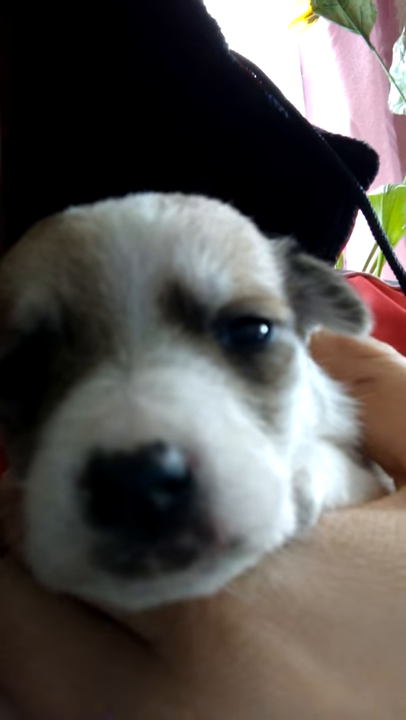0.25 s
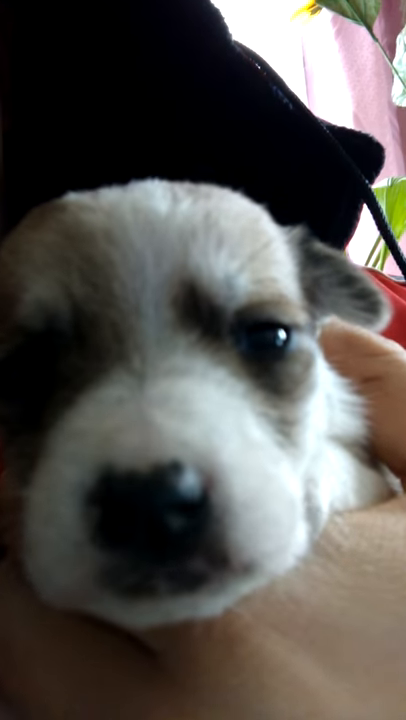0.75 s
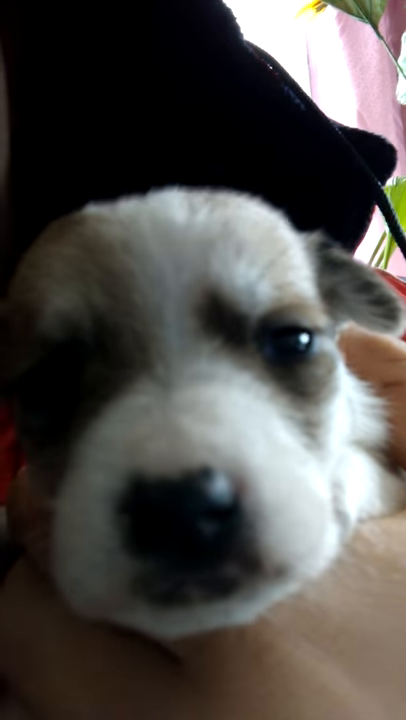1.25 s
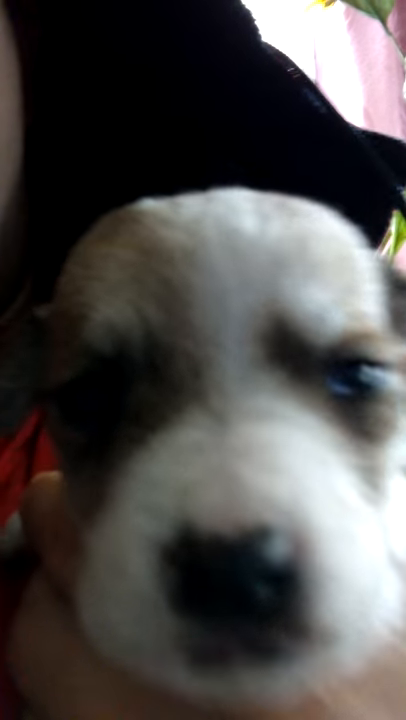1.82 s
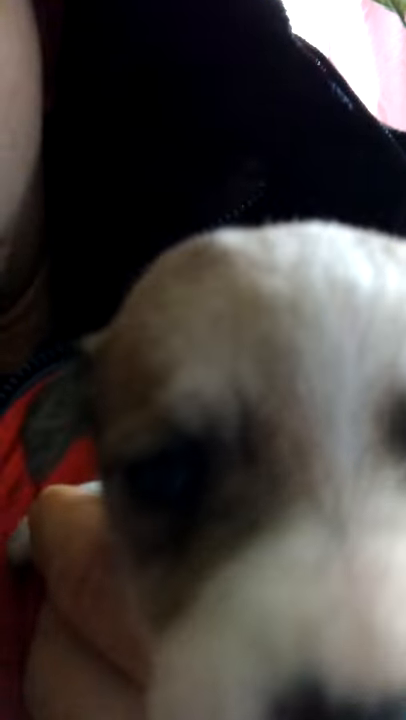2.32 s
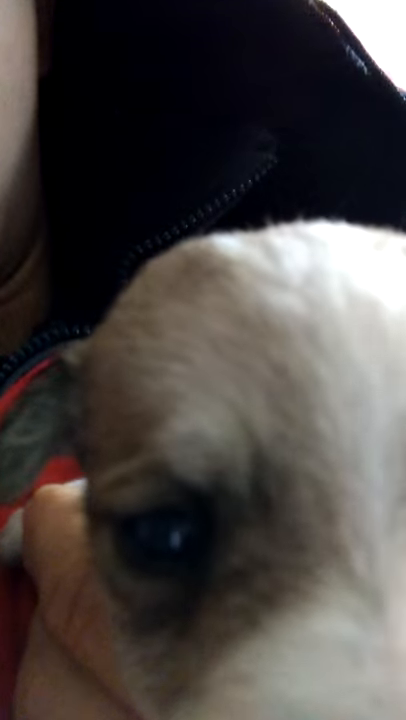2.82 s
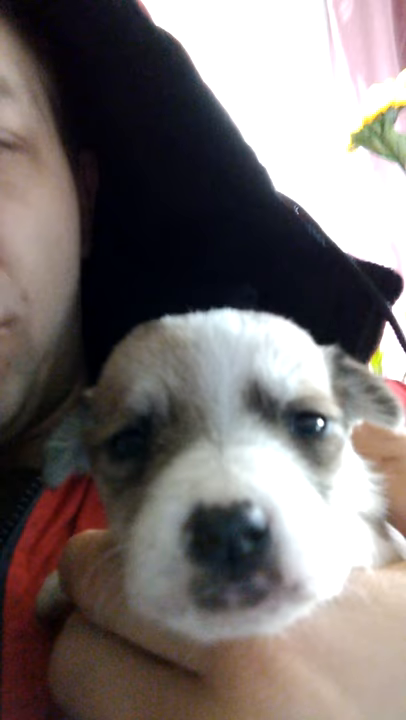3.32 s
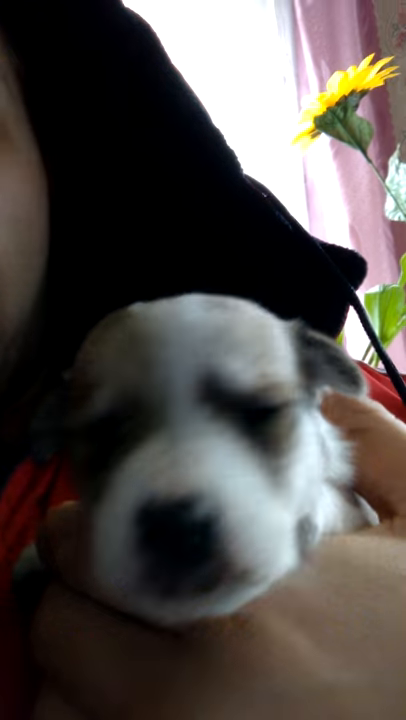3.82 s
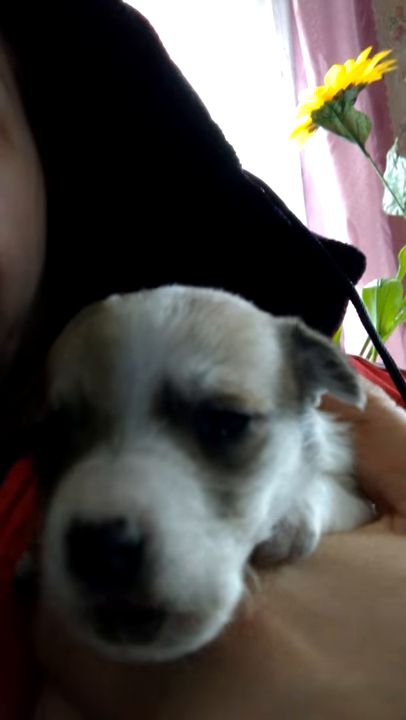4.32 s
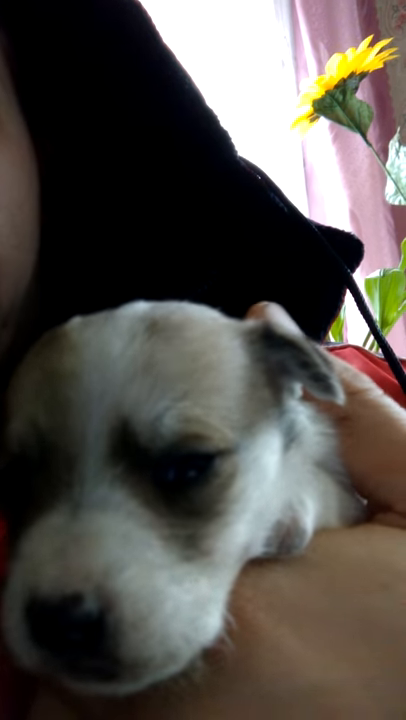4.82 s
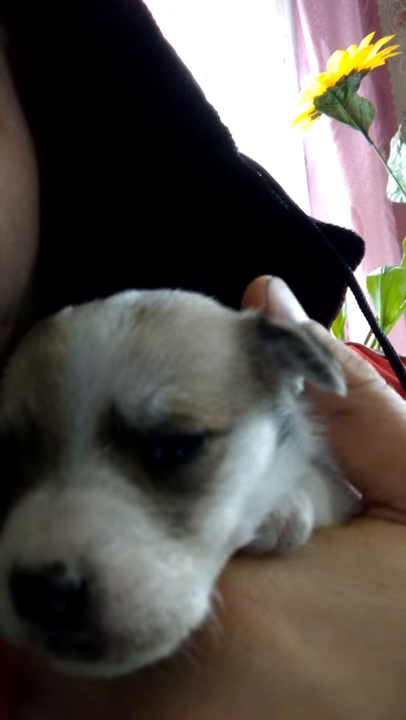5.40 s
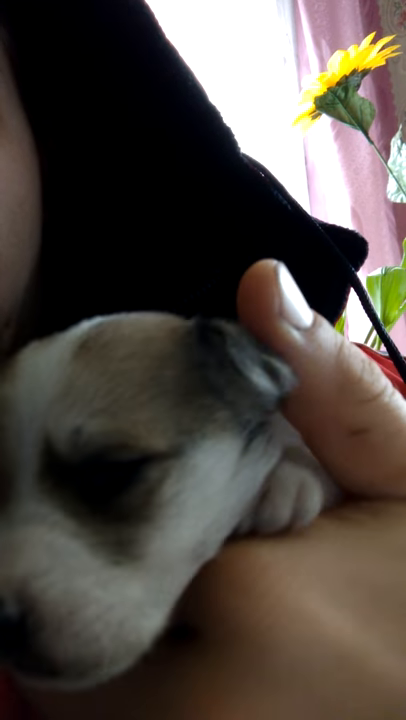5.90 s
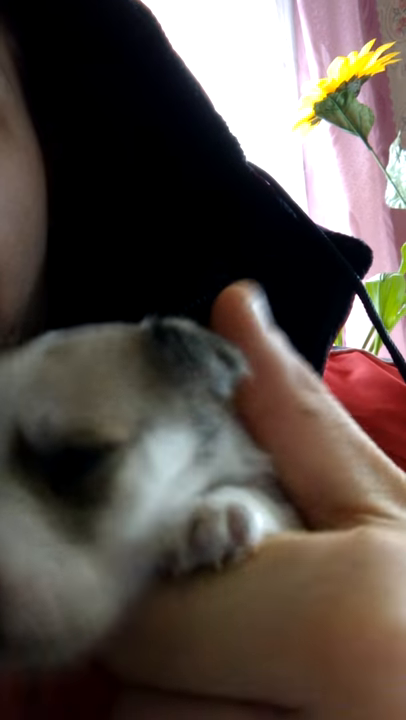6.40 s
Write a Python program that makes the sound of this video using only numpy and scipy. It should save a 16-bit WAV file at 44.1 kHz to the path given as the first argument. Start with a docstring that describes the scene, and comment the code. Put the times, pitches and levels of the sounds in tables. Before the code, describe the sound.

A very young puppy held close whines four times in a quiet room, three high gliding cries and one low grumble, then fur is stroked.

```python
"""Young puppy whining in a small room

A very young puppy, held in the arms close to a phone, whines four times in a small furnished room.
Each whine is a gliding harmonic stack coloured by throat and nose, with pulsing hiss; the last is a low grumble.
A sleeve brushes and a hand strokes fur (uneven filtered noise); soft bumps and wet ticks are short noise bursts.
Low rumble, faint microphone hiss and a thin electronic whistle lie underneath.
"""
import sys
import numpy as np
from scipy import signal
from scipy.fft import rfft, irfft, next_fast_len
from scipy.io import wavfile
from scipy.ndimage import uniform_filter1d

SR = 44100
rng = np.random.default_rng(int(sys.argv[2]) if len(sys.argv) > 2 else 0)


def transcribe(signal):
    """Save signal, clipped to [-1, 1], as a 16-bit WAV file at the path in sys.argv[1]."""
    frames = np.atleast_2d(signal).T
    limited = np.clip(frames, -1, 1)
    pcm = np.round(limited * 32767).astype(np.int16)
    wavfile.write(sys.argv[1], SR, pcm)


N = 294147
TIME = np.arange(N) / SR
TOP_HZ = 15550
# Signs of the two microphone ports. Rows: left, right.
SIDES = np.array([[1], [-1]])


def undb(db):
    """Decibels to gain."""
    return 10 ** (np.asarray(db) / 20)


def unit(x):
    """Scale to rms 1."""
    return x / np.sqrt(np.mean(x ** 2))


def curves(table, x):
    """Columns of a table, interpolated linearly over its first column."""
    knots, *columns = np.transpose(table)
    return [np.interp(x, knots, column) for column in columns]


def bell(t, centre_s, half_length_s):
    """Gaussian bump in time, peak 1."""
    return np.exp(-((t - centre_s) / half_length_s) ** 2)


def bin_hz(size):
    """Frequencies of the bins of a real FFT."""
    return np.arange(size // 2 + 1) * SR / size


def colour(points, hz):
    """Gain of a (Hz, dB) spectrum, interpolated over log frequency."""
    knots_hz, db = np.transpose(points)
    return undb(np.interp(np.log(hz + 1), np.log(knots_hz), db))


def shape(x, points):
    """Filter a sound by a (Hz, dB) spectrum."""
    n = x.shape[-1]
    size = next_fast_len(n)
    spectrum = rfft(x, size) * colour(points, bin_hz(size))
    return irfft(spectrum, size)[..., :n]


def resonate(x, hz, width_hz):
    """One resonance, gain 1 at its centre."""
    b, a = signal.iirpeak(hz, hz / width_hz, fs=SR)
    return signal.lfilter(b, a, x)


def walk(rate_hz, n):
    """Random curve of spread about 1: straight lines between knots, rate_hz knots a second."""
    knots = rng.standard_normal(8192)
    return 1.2 * np.interp(np.arange(n) * rate_hz / SR, np.arange(8192), knots)


def puppy():
    """Four whines, reaching the two ports with a level difference and lag that vary with frequency."""
    # One list per whine. Each row: time in seconds, pitch in Hz.
    pitches = [
        [(0.335, 409), (0.345, 426.6), (0.363, 465.5), (0.405, 447), (0.431, 520), (0.483, 618), (0.505, 654),
         (0.529, 620), (0.561, 664), (0.571, 681), (0.655, 732), (0.691, 729.4), (0.801, 799), (0.869, 675),
         (0.885, 574), (0.895, 475)],
        [(1.35, 603), (1.356, 611), (1.392, 694.5), (1.428, 693.5), (1.476, 780), (1.494, 865), (1.512, 819),
         (1.566, 943), (1.736, 909.3), (1.856, 835), (1.898, 823), (1.938, 860), (1.968, 828), (2.05, 815.7),
         (2.092, 772), (2.174, 779.5), (2.33, 626.4), (2.342, 581.0), (2.37, 472.2), (2.406, 410.6),
         (2.412, 394.1), (2.435, 307.0)],
        [(4.085, 509), (4.095, 530), (4.127, 771), (4.145, 866.6), (4.187, 898), (4.217, 858.6), (4.293, 977),
         (4.351, 998.6), (4.449, 928), (4.557, 765), (4.637, 700.4), (4.657, 579.5), (4.671, 497.6),
         (4.689, 396), (4.705, 360)],
        [(5.42, 435), (5.426, 450.3), (5.48, 557), (5.52, 445.4), (5.556, 329.2), (5.586, 319.8), (5.624, 437),
         (5.68, 537.4), (5.714, 472), (5.756, 458), (5.796, 393.3), (5.84, 416.6), (5.865, 303.2)],
    ]
    # One push of air per whine. Each row: start in s, end in s, attack in s, rise of higher overtones in s,
    # level in dB, swell in dB/s, swell in dB/octave of pitch, mellowness in dB, higher overtones in dB, hiss in dB.
    pushes = [(.33, 0.906, 0.18, 0.11, -33, 2.5, 13, 1.36, -55.5, -56.5),
              (1.345, 2.442, 0.03, 0.017, -23, 4, 3.46, 4, -30, -56.7),
              (4.079, 4.711, 0.036, 0.082, -24.5, 6.5, 2.3, 3, -36, -48),
              (5.416, 5.885, 0.052, 0.03, -29, -16, -0.8, 1.96, -35.5, -55)]
    # Muzzle resonances near 1 and 2 kHz for the three lowest partials, one list per whine.
    # Each row: frequency in Hz, gain in dB.
    muzzles = [
        [(420, -4.5), (700, -8), (870, -4), (1080, 3), (1300, -4.5), (1700, -13), (2050, -19), (2400, -15)],
        [(350, -16), (550, -20), (900, -7.5), (1100, -4), (1350, -10), (1750, -1.5), (2080, -9), (2550, -19.5),
         (2850, -19.5)],
        [(370, -11), (550, -22.5), (900, -9), (1100, -4.5), (1450, -13.5), (2000, -2.15), (2350, -9),
         (3000, -25)],
        [(320, -7.5), (520, -13), (700, -7), (1000, 1), (1300, -3), (1650, -11.5)],
    ]
    # Throat and nose colour of the higher overtones, one list per whine. Each row: frequency in Hz, gain in dB.
    throats = [
        [(1800, -6), (2500, 3), (3900, -10), (4400, -21), (5300, -7.5), (6000, -32), (7500, -20), (9000, -45),
         (10700, -2), (12600, -11), (15300, -26)],
        [(1500, -5), (1900, -6), (3000, -32.5), (3800, -37), (4700, -39.5), (5500, -46.5), (7800, -32.5),
         (9100, -44), (10400, -33), (14000, -65.5)],
        [(1500, -14.5), (2100, 5.5), (3100, -31), (3500, -32), (4800, -32.5), (5500, -56.5), (6100, -25),
         (8000, -28), (9100, -44), (10300, -25), (15300, -51)],
        [(1300, 2.5), (1600, -7), (2300, -9), (3200, -24.5), (4500, -37), (8800, -41), (10500, -31),
         (15300, -49)],
    ]
    # Hiss colour, one list per whine. Each row: frequency in Hz, relative density in dB per Hz.
    hisses = [
        [(200, -35), (700, -20), (1200, -2.5), (2000, -35), (2700, -13), (5900, -30), (7600, -12.5),
         (9000, -43), (10700, -8.5), (12600, -29), (13700, -20), (15300, -21)],
        [(200, -17), (1100, -2), (1500, 0.5), (2100, 0.5), (3000, -29.5), (4600, -6.5), (5900, -28.5),
         (7600, -9), (9100, -32), (10300, -16), (12400, -34), (13200, -18.5), (14500, -35)],
        [(200, -15.5), (1000, -3), (1400, -7), (2100, 11), (3200, -17), (3700, -6.5), (5300, -24),
         (6500, -28.5), (10800, -23), (15300, -31.5)],
        [(200, -10), (900, -6.5), (1600, 0), (2600, -3.5), (4400, -14.5), (8000, -16.5), (9000, -23),
         (10500, -11), (13000, -25), (15300, -30)],
    ]
    # One row per whine: bearing as a share of the port lag, pitch jitter as a share,
    # phase blur at 10 kHz in rad, fall per overtone in dB.
    manners = [(1.146, 0.0043, 0.87, 2), (1.123, .001, .45, 0.78), (0.77, 0.0011, 0.55, 1.7),
               (0.66, 0.0014, 0.67, 0.5)]
    # Microphone ports on the phone's body. Each row: frequency in Hz, left minus right in dB,
    # lag of the left in rad at bearing 1.
    port_response = [(60, 1.5, -1.5), (350, 0.5, 0.47), (716, -1, 0.55), (1340, 3, 1.25), (1850, 1, 2),
                     (2980, -1.5, 2), (5420, 4.5, 1.12), (9740, 7.5, 11.5), (15400, 9, 16.5)]
    out = np.zeros((2, N))
    for pitch, push, muzzle, throat, hiss, manner in zip(pitches, pushes, muzzles, throats, hisses, manners):
        bearing, *voice_manner = manner
        i = np.arange(int(push[0] * SR), int(push[1] * SR))
        t = i / SR
        fade = np.clip(np.minimum(t - t[0], t[-1] - t) / 0.00066, 0, 1)
        sound = fade * whine(t, pitch, push, muzzle, throat, hiss, *voice_manner)
        size = next_fast_len(2 * len(t))
        port_db, port_lag_rad = curves(port_response, bin_hz(size))
        spectrum = rfft(sound, size)
        spectrum *= undb(port_db * SIDES / 2) * np.exp(-.5j * bearing * port_lag_rad * SIDES)
        out[:, i] += irfft(spectrum, size)[:, :len(t)]
    return out


def whine(t, pitch, push, muzzle, throat, hiss, jitter, blur_rad, fall_db):
    """Vocal folds sound a gliding harmonic stack; air hisses through them once a cycle."""
    # Folds slip into strong-weak cycles. Each row: centre in s, half length in s, depth 0-1.
    croaks = [(0.392, 0.032, 0.37), (5.875, 0.005, 0.83)]
    # Throat and mouth shift briefly and one resonance stands out.
    # Each row: centre in s, half length in s, frequency in Hz, width in Hz, added resonance in dB.
    mouth_shifts = [(.872, 0.042, 1900, 500, 4.5), (1.442, .05, 7700, 1200, -4.5),
                    (2.344, 0.19, 4450, 500, 3), (2.392, 0.026, 2540, 510, 3),
                    (4.166, 0.011, 2620, 150, 24), (4.166, 0.014, 7000, 3500, 11),
                    (4.2, .05, 10500, 700, 9), (4.21, 0.024, 2620, 200, 11.5),
                    (4.61, 0.047, 4400, 700, 1.5), (5.514, 0.053, 2610, 394, 10.5)]
    n = len(t)
    hz = uniform_filter1d(curves(pitch, t)[0], size=220)
    *partials_db, upper_db, air_db = effort(t, hz, muzzle, *push)

    # quick jitter and a slower quiver of the folds
    wobbling_hz = hz * (1 + jitter * walk(700, n) + .003 * walk(55, n))
    phase = 2 * np.pi * np.cumsum(wobbling_hz) / SR
    tone = np.zeros(n)
    for k, db in enumerate(partials_db, 1):
        tone -= undb(db + .3 * walk(60, n)) * np.cos(k * phase)
    for k in range(4, 41):
        gain = colour(throat, k * hz) * np.clip((TOP_HZ - k * hz) / 500, 0, 1)
        overtone_db = upper_db + 2.2 * walk(40, n) - fall_db * (k - 4.5)
        # turbulence smears the highest overtones most
        smear = blur_rad * (k * hz / 1e4) ** 2 * walk(500, n)
        tone -= gain * undb(overtone_db) * np.cos(k * phase + smear + rng.uniform(0, 2 * np.pi))
    croak = sum(depth * bell(t, s, half_s) for s, half_s, depth in croaks)
    tone *= np.sqrt(2) * (1 + croak * np.cos(phase / 2))

    # scattered hiss reaches the two ports with opposite sign, strongest in the treble
    direct, scattered = rng.standard_normal((2, n))
    air = direct + shape(scattered, [(3000, -8.5), (10000, 1.5)]) * SIDES
    pulsing_air = air * (1 + np.cos(phase))
    sound = tone + undb(air_db) * unit(shape(pulsing_air, hiss))
    for s, half_s, mouth_hz, width_hz, db in mouth_shifts:
        sound = sound + undb(db) * bell(t, s, half_s) * resonate(sound, mouth_hz, width_hz)
    return sound


def effort(t, hz, muzzle, start_s, end_s, attack_s, rise_s, level_db, swell_db_per_s,
           swell_db_per_octave, mellow_db, upper_db, air_db):
    """Push of air and pitch set the levels (dB) of three lowest partials, higher overtones and hiss."""
    # The push falters or surges, heard in the lowest partials. Each row: centre in s, half length in s, change in dB.
    surges = [(1.503, 0.058, -3.5), (1.876, 0.041, 1.8), (2.09, 0.084, -1.3), (4.145, .013, 5),
              (4.225, .02, -1), (5.429, 0.019, -10), (5.646, 0.031, -2), (5.72, .03, 2.4)]
    easy_hz = 693  # pitch at which the pitch-dependent terms vanish
    attack_db, late_overtone_db, upper_late_db = 6, 6, 15.5  # onset deficits; late: per further partial
    catch_s, release_s, edge_db = 0.0042, .014, 18.5  # folds catch and part quickly
    brighten_db_per_octave = 13.5  # tighter folds: stronger high overtones
    clear_db_per_octave = 28.5  # above the easy pitch they close better and leak less hiss

    age_s, octaves = t - start_s, np.log2(hz / easy_hz)
    opening = np.clip(1 - age_s / attack_s, 0, 1)
    rising = np.clip(1 - age_s / rise_s, 0, 1)
    edge = np.clip(1 - np.minimum(age_s / catch_s, (end_s - t) / release_s), 0, 1)
    envelope_db = -attack_db * opening - edge_db * edge
    late_db = late_overtone_db * opening
    surge_db = sum(db * bell(t, s, half_s) for s, half_s, db in surges)
    swell_db = swell_db_per_s * age_s + swell_db_per_octave * octaves
    push_db = level_db + envelope_db + surge_db + swell_db
    partials_db = []
    for k in range(3):
        muzzle_db = 20 * np.log10(colour(muzzle, (k + 1) * hz))
        partials_db.append(push_db + muzzle_db - k * late_db - k ** 2 * mellow_db)
    upper_db = upper_db + envelope_db - upper_late_db * rising + brighten_db_per_octave * octaves
    air_db = air_db + envelope_db - 2 * late_db - clear_db_per_octave * np.maximum(octaves, 0)
    return *partials_db, upper_db, air_db


def room(x, wet_db, t60_s, mode_hz, mode_db, mode_width_hz):
    """A short dull tail of decaying noise; one low room mode rings on when a whine sinks through it."""
    t = TIME[:SR // 2]
    tail = rng.standard_normal((2, len(t))) * undb(-60 * t / t60_s) * np.clip(t / 0.034, 0, 1)
    energy = np.sum(tail ** 2) / 2
    tail = shape(tail, [(300, 13.5), (1200, -2.5), (3000, 9.5), (12000, -25.0)]) / np.sqrt(energy)
    wet = signal.fftconvolve(x[None], tail, axes=1)[:, :N]
    return undb(wet_db) * wet + undb(mode_db) * resonate(x, mode_hz, mode_width_hz)


def mouth_ticks():
    """Wet ticks of mouth and throat: short resonant bursts."""
    # Each row: start in s, level before decay in dB, centre in Hz, decay in s.
    tick_rows = [(.215, -66, 3440, 0.037), (4.151, -37, 1860, .003), (5.132, -54.5, 4100, 0.0014),
                 (5.886, -43.5, 1144, 0.0085)]
    return taps(tick_rows, width_share=0.98)


def handling_bumps():
    """Soft bumps of handling: short low bursts."""
    # Each row: start in s, level before decay in dB, centre in Hz, decay in s.
    bump_rows = [(1.262, -55, 196, 0.0075), (4.508, -43, 254, 0.0036), (5.018, -53, 241, 0.0041),
                 (6.05, -62, 84, 0.047), (6.471, -54.5, 233, 0.0069)]
    return taps(bump_rows, width_share=1.0)


def taps(table, width_share):
    """Contact noise in a broad double resonance, decaying exponentially."""
    out = np.zeros(N)
    t = TIME[:SR // 6]
    for s, db, hz, decay_s in table:
        noise = rng.standard_normal(len(t))
        for _ in range(2):
            noise = resonate(noise, hz, hz * width_share)
        burst = undb(db) * unit(noise) * np.exp(-t / decay_s) * np.clip(t / .0007, 0, 1)
        start = int(s * SR)
        out[start:start + len(t)] += burst[:N - start]
    return out


def fur_stroke():
    """A hand slides over fur."""
    # Each row: time in s, level in dB.
    levels = [(5.9, -72), (6.035, -63), (6.06, -53.5), (6.09, -62.5), (6.16, -52.5), (6.27, -52),
              (6.38, -55.5), (6.47, -64.5), (6.66, -73)]
    # Each row: frequency in Hz, relative density in dB per Hz.
    fur_colour = [(59, -45), (100, -9.5), (252, -2.5), (383, -10), (1050, -8), (2000, -18.5),
                  (11400, -28.5), (15000, -40)]
    return rub(levels, fur_colour, grain_db=1.5, tilt_db=2.0)


def sleeve_brush():
    """A sleeve brushes as the arm moves."""
    # Each row: time in s, level in dB.
    levels = [(2.9, -102), (3.12, -70), (3.3, -64.5), (3.47, -81), (3.6, -64), (4, -90)]
    # Each row: frequency in Hz, relative density in dB per Hz.
    cloth_colour = [(150, -8), (400, -0.5), (1300, -4.5), (2200, -5), (5000, -7), (9000, -21.5),
                    (15000, -27)]
    return rub(levels, cloth_colour, grain_db=1.0, tilt_db=2)


def rub(levels, surface, grain_db, tilt_db):
    """Fibres catch and slip as two soft things slide: uneven rustle, tilt_db up left and down right."""
    grainy = port_noise(side_db=1.5) * undb(grain_db * walk(360, N))
    rustle = shape(grainy, surface)
    level_db = curves(levels, TIME)[0] + 1.3 * walk(30, N)
    return unit(rustle) * undb(level_db + tilt_db * SIDES)


def port_noise(side_db):
    """Noise at both ports: side_db sets the bass difference signal; the treble is unrelated."""
    mid, side = rng.standard_normal((2, N))
    return mid + shape(side, [(100, side_db), (600, side_db), (2000, 0.0014)]) * SIDES


def floor(level_db, whistle_hz, whistle_db):
    """Low room rumble and microphone hiss, with a thin electronic whistle of narrow-band noise."""
    # Each row: frequency in Hz, relative density in dB per Hz.
    floor_colour = [(15, -46), (25, -0.5), (79, -1), (267, -15), (331, -13.5), (509, -20.5), (782, -21),
                    (1140, -22.5), (15500, -25.5)]
    noise = shape(port_noise(side_db=-6.0), floor_colour)
    noise *= undb(level_db + 0.19 * walk(8.2, N) + SIDES) / np.std(noise.mean(0))
    whistle = unit(resonate(rng.standard_normal((2, N)), whistle_hz, 110))
    return noise + undb(whistle_db) * whistle


def scene():
    """Puppy, room, handling and floor."""
    voice = puppy()
    echo = room(voice[1], wet_db=-24, t60_s=.3, mode_hz=355, mode_db=-14, mode_width_hz=11)
    contacts = mouth_ticks() + handling_bumps()
    rustles = fur_stroke() + sleeve_brush()
    return voice + echo + contacts + rustles + floor(level_db=-69, whistle_hz=10120, whistle_db=-79.0)


def record(dry):
    """The phone cuts the deepest rumble and the top."""
    rumble_cut = signal.butter(4, 42, "high", fs=SR, output="sos")
    top_cut = signal.ellip(10, .1, 80, TOP_HZ, fs=SR, output="sos")
    return signal.sosfilt(top_cut, signal.sosfilt(rumble_cut, dry))


dry = scene()
out = record(dry)
transcribe(out)
```